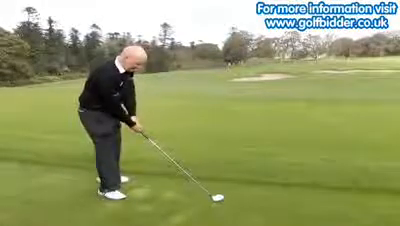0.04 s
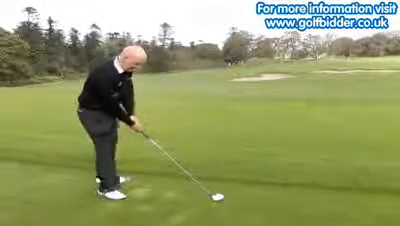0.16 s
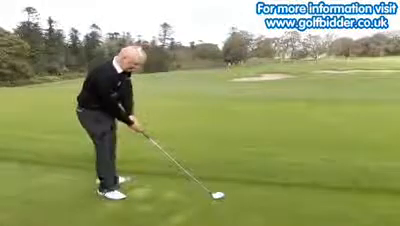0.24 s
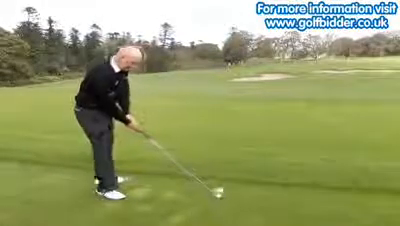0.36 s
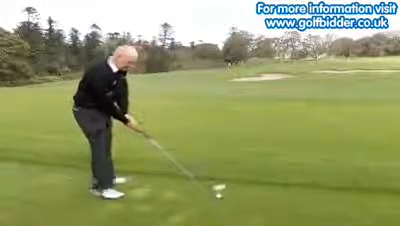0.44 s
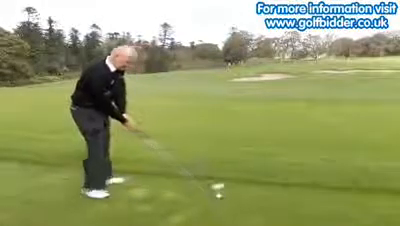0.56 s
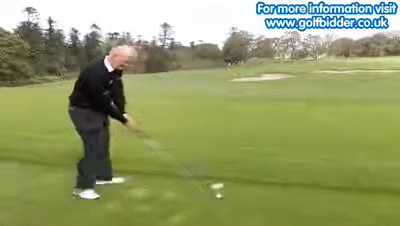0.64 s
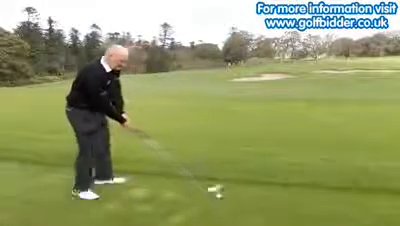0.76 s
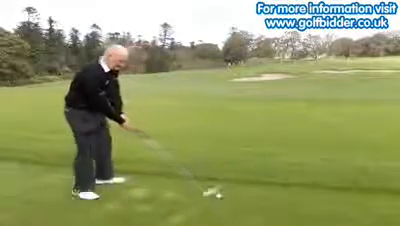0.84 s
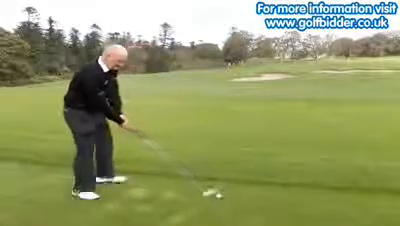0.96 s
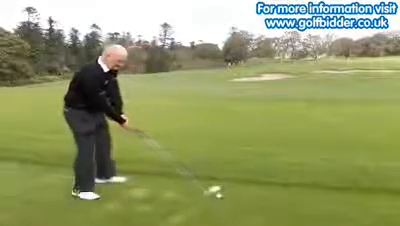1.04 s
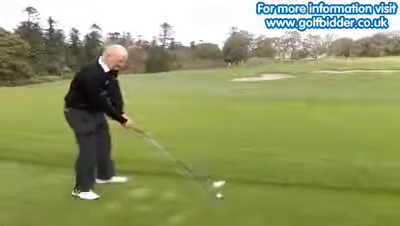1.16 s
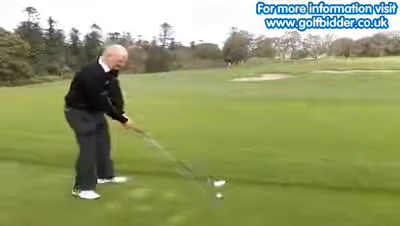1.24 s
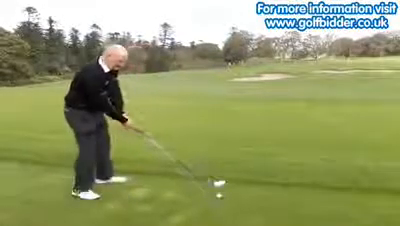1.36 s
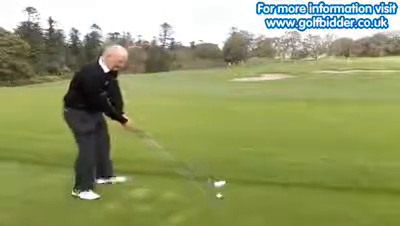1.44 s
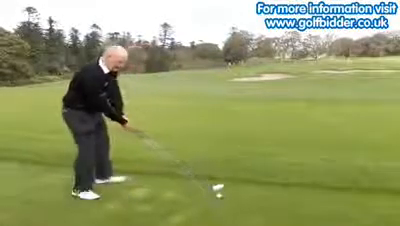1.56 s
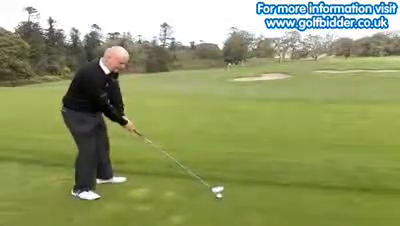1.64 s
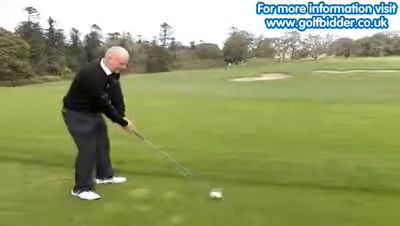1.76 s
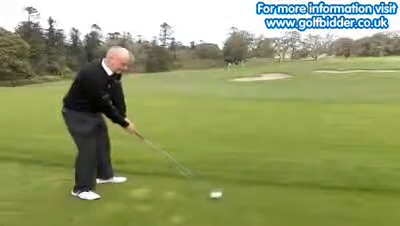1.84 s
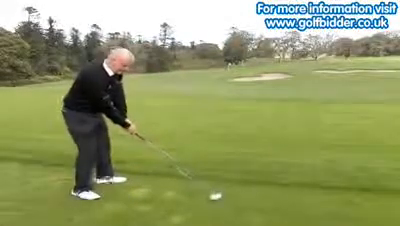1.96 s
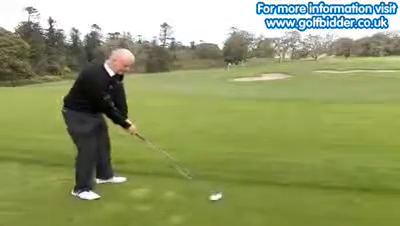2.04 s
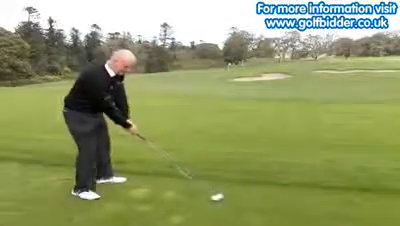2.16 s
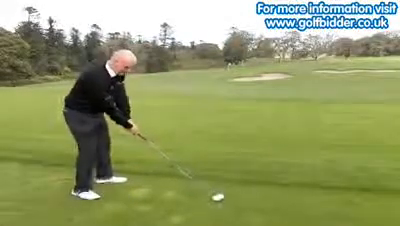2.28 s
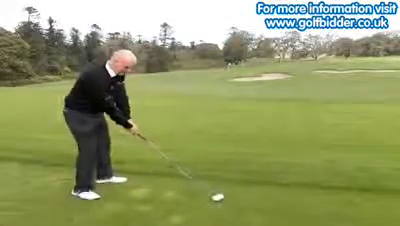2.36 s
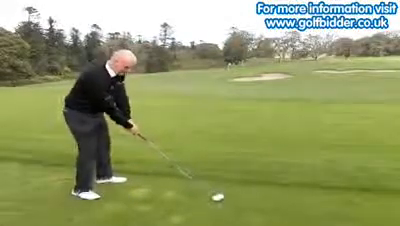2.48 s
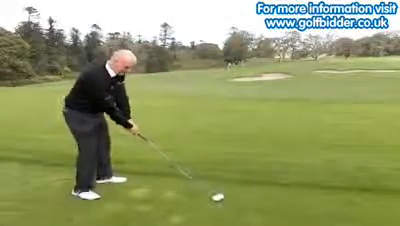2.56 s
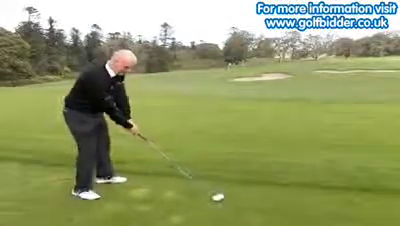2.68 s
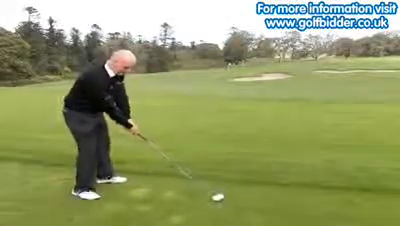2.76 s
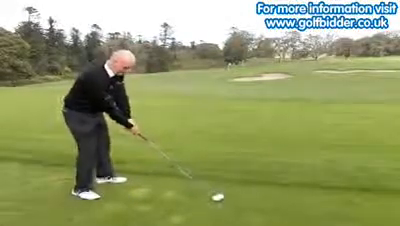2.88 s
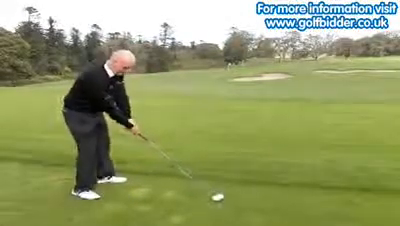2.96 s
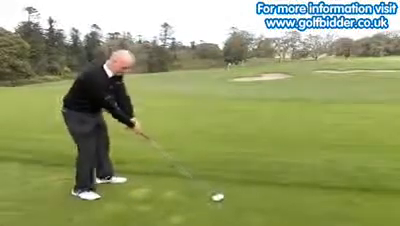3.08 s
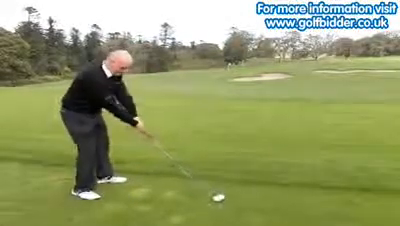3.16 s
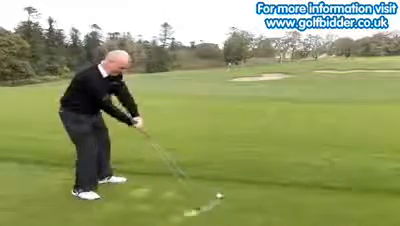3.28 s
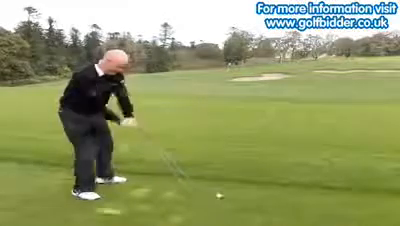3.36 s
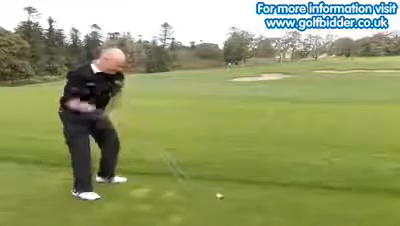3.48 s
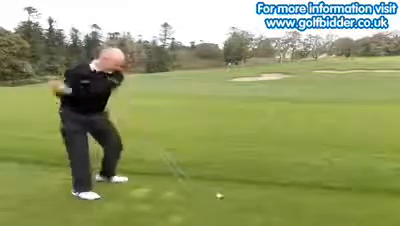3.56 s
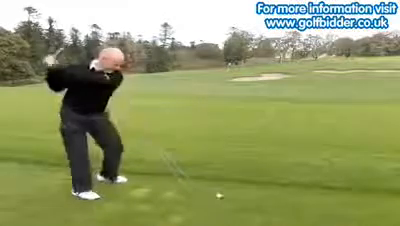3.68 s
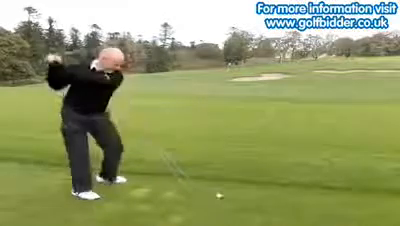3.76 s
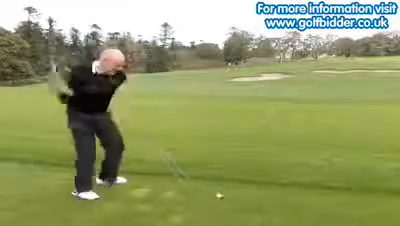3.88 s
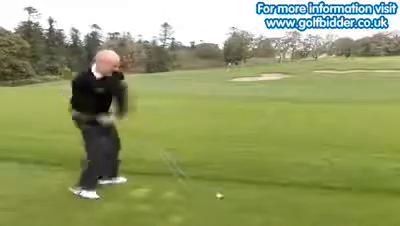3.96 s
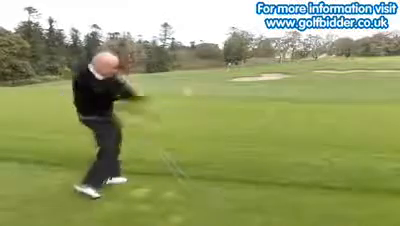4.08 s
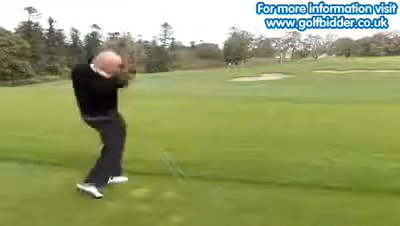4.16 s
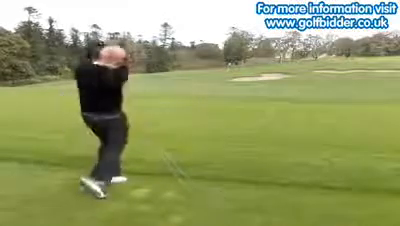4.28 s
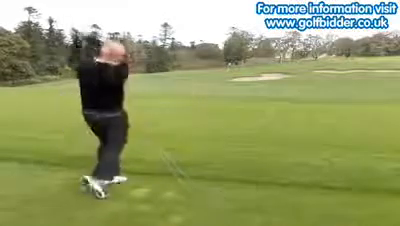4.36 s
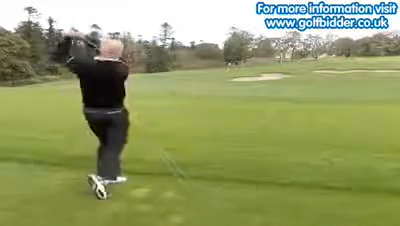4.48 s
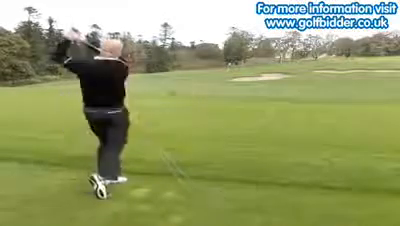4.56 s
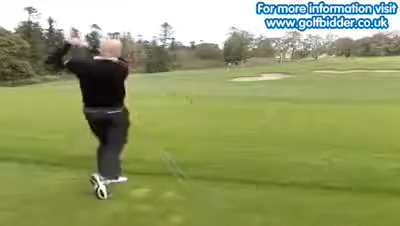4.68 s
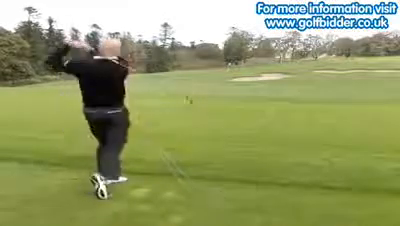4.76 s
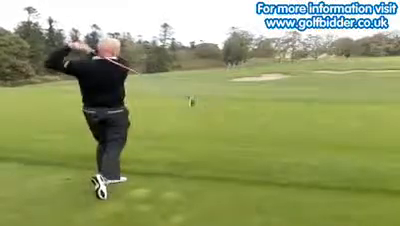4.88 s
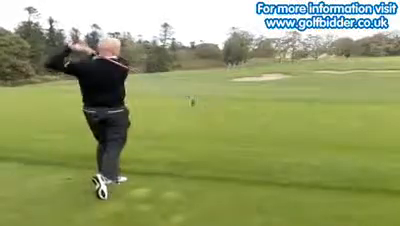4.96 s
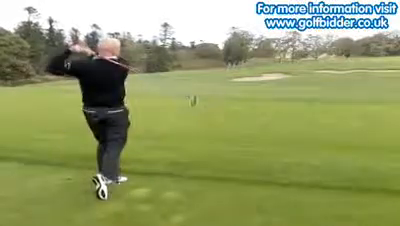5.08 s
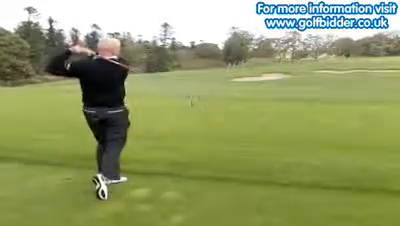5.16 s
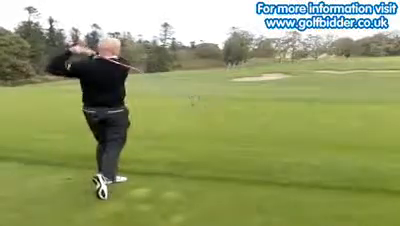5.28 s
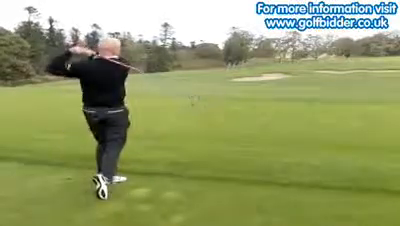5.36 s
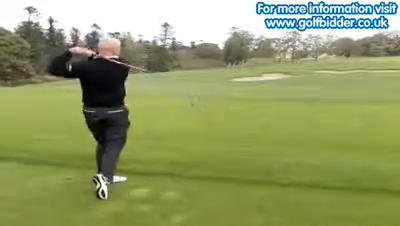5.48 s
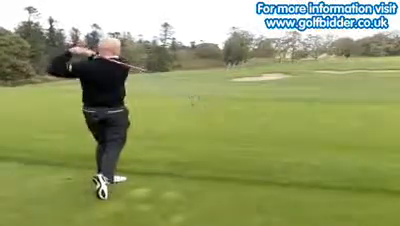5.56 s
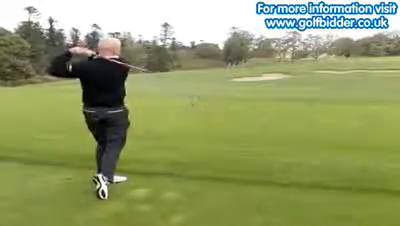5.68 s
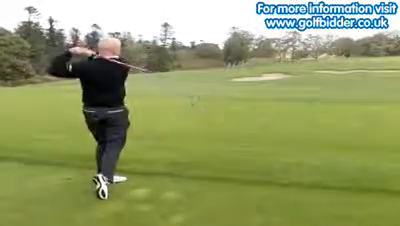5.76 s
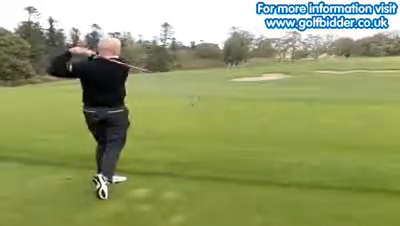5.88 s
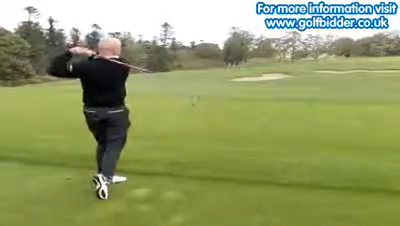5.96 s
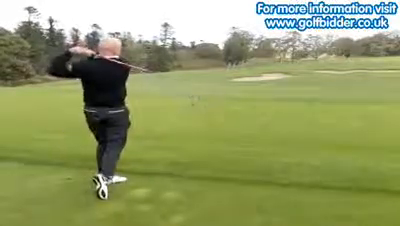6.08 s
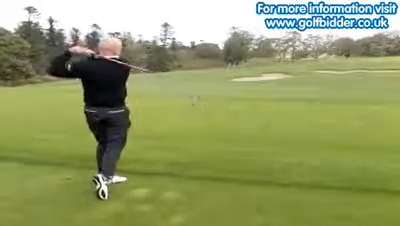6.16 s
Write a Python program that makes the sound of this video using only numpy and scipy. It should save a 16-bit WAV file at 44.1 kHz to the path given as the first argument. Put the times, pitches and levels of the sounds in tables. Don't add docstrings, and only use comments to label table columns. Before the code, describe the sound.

Outdoors on an open fairway, low wind gusts thump and flutter against a small camera microphone over a soft hiss of far trees. About two thirds through, a quick swish climbs into one hard, hollow crack of club on ball, a few metres away, overloading the input. A brief metallic ring and weak echo fade, and the wind returns.

```python
import sys
import numpy as np
from scipy import signal
from scipy.fft import rfft, irfft, dct, next_fast_len
from scipy.io import wavfile
from scipy.ndimage import uniform_filter1d

SR = 44100
rng = np.random.default_rng(int(sys.argv[2]) if len(sys.argv) > 2 else 0)


def volts_from_db(level):
    exponent = np.asarray(level, float) / 20
    return 10 ** exponent


def to_wav(sig):
    pcm = np.clip(np.atleast_2d(sig), -1, 1) * 32767
    pcm = np.round(pcm).astype(np.int16)
    wavfile.write(sys.argv[1], SR, pcm.T)


N = 274698
T = np.arange(N) / SR
STRIKE_S = 4.2339
CONTACT_S = 0.0003


def curve(rows, column=1):
    rows = np.array(rows, float)
    return np.interp(T, rows[:, 0], rows[:, column])


def noise(colour):
    hz, db = np.transpose(colour)
    size = next_fast_len(N)
    bins = np.arange(size // 2 + 1) * SR / size + 1e-3
    gain = volts_from_db(np.interp(np.log(bins), np.log(hz), db, -150, -150))
    x = irfft(rfft(rng.standard_normal(size)) * gain, size)[:N]
    return x / np.std(x)


def walk(rate):
    k = int(SR / rate)
    held = np.repeat(rng.standard_normal(N // k + 1), k)
    return 1.3 * uniform_filter1d(uniform_filter1d(held, k), k)[:N]


def bump(at_s, length_s):
    return np.exp(-0.5 * ((T - at_s) / length_s) ** 2)


def swell(at_s, db, hz, length_s):
    return volts_from_db(db) * bump(at_s, length_s) * np.sin(2 * np.pi * (hz * (T - at_s) + rng.random()))


def ring(at_s, db, hz, t60_s, rise_s=CONTACT_S):
    t = np.maximum(T - at_s, 0)
    push = 1 - np.exp(-(t / rise_s) ** 2)
    decay = np.exp(-np.log(1000) * t / t60_s)
    return volts_from_db(db) * push * decay * np.sin(2 * np.pi * hz * t)


# time in seconds, level in dB.
TREES = [(0, -40), (.5, -37), (1.5, -35), (2.2, -35.5), (3.0, -34.5), (4.1, -34.5), (4.65, -35.5),
         (6.23, -34)]
# frequency in Hz, density in dB per Hz.
LEAVES = [(200, -24.5), (330, -3.5), (450, -1.5), (800, -3.5), (1300, -10), (1750, -14.5), (2200, -19),
          (2600, -28.5), (2850, -43), (3100, -28), (3600, -24), (4400, -31), (5200, -35.5), (7500, -43.5),
          (8500, -64)]


def trees():
    return noise(LEAVES) * volts_from_db(curve(TREES) + 1.46 + 0.65 * walk(5.5))


def steady(x, seconds):
    return x / np.sqrt(uniform_filter1d(x ** 2, size=int(SR * seconds)) + 0.073)


# time in seconds, strength in dB.
BREEZE = [(0, -23.5), (.3, -21.5), (.9, -24.5), (1.4, -22), (2.0, -22.5), (2.5, -21.5), (2.85, -23),
          (3.1, -25.5), (3.5, -22.5), (4.05, -26), (4.24, -22.5), (4.29, -30.5), (4.45, -24.5),
          (4.7, -27.5), (5.1, -21), (5.25, -28), (5.6, -26.5), (6.23, -31)]
# time in seconds, rise in dB, length in seconds,
# fineness from 0 (big slow lumps) to 1 (small quick ones).
GUSTS = [(.09, 13, 0.047, 0.26), (0.155, 7, 0.043, 0.1), (0.425, 2.5, 0.055, 1), (.59, 4.5, 0.092, .5),
         (0.83, 4.5, 0.073, .1), (1.038, -1, .02, .9), (1.122, 7.5, 0.088, 0.25), (1.361, 4, 0.049, .6),
         (1.478, 7.5, 0.032, 0), (1.833, 12.5, 0.035, 0.46), (1.97, 10, 0.029, 0.95),
         (2.097, 10.5, .03, 0.88), (2.23, 5, .03, 0.32), (2.56, 2.5, 0.049, 0), (2.634, 7.5, 0.024, 0.92),
         (2.745, 8.5, 0.076, .8), (3.32, 3.5, 0.047, 1), (3.402, 4, 0.04, 0), (3.586, 7, 0.037, 0.47),
         (3.75, 5.5, 0.034, 0.5), (3.987, 7.5, .05, 0.3), (4.547, 4, 0.033, 0.6), (4.79, 11.5, 0.035, 0.25),
         (4.955, 6.5, 0.097, 0.28), (5.138, 7.5, .04, 0.47), (5.67, 2, 0.055, 0.74), (5.802, 8, 0.046, 0),
         (5.95, 13.5, 0.022, 0.4), (6.03, 6, .02, 0.03), (6.18, 7.5, .03, 0.22)]


def gusting(offset_db, follow, coarse_share, fine_share):
    mean_db = -25
    db = mean_db + offset_db + follow * (curve(BREEZE) - mean_db)
    for at_s, rise_db, length_s, fine in GUSTS:
        share = coarse_share * (1 - fine) + fine_share * fine
        db = db + rise_db * share * bump(at_s, length_s)
    return volts_from_db(db)


# frequency in Hz, density in dB per Hz.
RUMBLE = [(4, -14), (11, -1), (28, -4.5), (48, -1.5), (80, -7), (120, -23), (200, -54.5)]
FLUTTER = [(50, -26), (90, -0.5), (130, -1.5), (190, -5.5), (280, -20), (500, -40)]
WHIP = [(120, -20.5), (200, -2), (300, -4), (420, -16.5), (700, -27)]


def wind():
    rumble = steady(noise(RUMBLE), 0.12) * gusting(0.23, 1.05, 0.9, 0.035)
    flutter = steady(noise(FLUTTER), 0.1) * gusting(-5, 0.56, 0.088, 0.94) * volts_from_db(0.8 * walk(13))
    whip = steady(noise(WHIP), 0.084) * gusting(-14.5, 0.54, 0.18, 1.27) * volts_from_db(1.2 * walk(20))
    return rumble + flutter + whip


# start in seconds, level in dB, pitch in Hz, t60 in seconds.
SOLE = [
    (0.96, -39, 2500, 0.027),
    (0.857, -41, 3400, .03),
]


def address():
    return sum(ring(*touch) for touch in SOLE)


def treeline():
    level_db, t60_s, flicker_db = -37.5, 0.6, 2.5
    after = T - STRIKE_S
    db = level_db - 60 * abs(after) / t60_s + flicker_db * walk(90)
    return noise(RUSH_COLOUR) * volts_from_db(db) * (after > 0)


# frequency in Hz, density in dB per Hz.
BRIGHT_HISS = [(1500, -22), (2400, -3), (3500, -1), (4700, 0.5), (5200, -24)]


def bright_hiss():
    level_db, lead_s, last_s, ramp_s = -39.5, 0.03, 0.043, 0.006
    after = T - STRIKE_S
    brush = np.clip(np.minimum(after + lead_s, last_s - after) / ramp_s, 0, 1)
    return noise(BRIGHT_HISS) * volts_from_db(level_db) * brush


# start in seconds, level in dB, pitch in Hz, t60 in
# seconds.
TURF = [
    (4.267, -20, 910, 0.0087),
    (4.267, -24.5, 1700, 0.0067),
    (4.273, -28, 464, 0.054),
    (4.3165, -34, 1520, .006),
]


def turf():
    return sum(ring(*hit) for hit in TURF)


# peak time in seconds, peak level in dB, pitch in Hz, length in seconds.
EDDIES = [(4.143, -24, 427, 0.0067), (4.157, -7.5, 486, 0.0021), (4.166, -11.5, 557, .003),
          (4.178, -9.5, 633, 0.0052), (4.185, -17, 690, 0.0027), (4.194, -13.5, 680, .003),
          (4.2022, -4.5, 747, .002), (4.210, -5, 700, 0.002), (4.220, -8.5, 776, 0.0039),
          (4.226, -7.5, 695, 0.0019), (4.233, -10, 698, .0012)]
# time in seconds, level in dB.
RUSH = [(4.12, -59), (4.155, -26.5), (4.19, -21), (4.215, -13.5), (4.232, -12), (4.24, -30.5), (4.27, -34),
        (4.29, -44)]
# frequency in Hz, density in dB per Hz.
RUSH_COLOUR = [(100, -11.5), (300, 7.5), (450, 2), (650, 3.5), (900, 0), (1400, -6.5), (2200, -20),
               (3500, -24), (4700, -28), (6500, -32), (7200, -50)]


def swing():
    whistle = sum(swell(*eddy) for eddy in EDDIES)
    rush = noise(RUSH_COLOUR) * volts_from_db(curve(RUSH)) * (abs(T - 4.2) < 0.1)
    return whistle + rush


CROWN_HZ = [5190, 5577, 5950, 6100, 6200, 6445, 7300, 7430, 7500, 7745, 8345]
# level in dB, t60 in seconds.
CROWN = [(-29, .06), (-38, 0.077), (-26, 0.089), (-52, 0.4), (-30, 0.084), (-26.5, .07), (-34, 0.13),
         (-26, 0.067), (-34, .09), (-25.5, 0.049), (-30, 0.074)]


def crown():
    return sum(ring(STRIKE_S, db, hz, t60, rise_s=0.0028) for hz, (db, t60) in zip(CROWN_HZ, CROWN))


# pitch in Hz, level in dB against the strike, t60 in seconds.
FACE = [(1160, 6, .0075), (1412, 5.5, .007), (1653, 2, 0.007), (2384, -10.5, 0.013), (2932, -9, 0.014),
        (3684, -4, 0.0063), (4020, -11.5, 0.012), (4490, -18, 0.02), (6080, -20.5, 0.024)]


def face():
    strike_db = -0.5
    return sum(ring(STRIKE_S, strike_db + db, hz, t60) for hz, db, t60 in FACE)


def duck():
    drop_s, hold_s, back_s = 0.08, 0.19, 0.026
    after = T - STRIKE_S
    drop = np.clip(1 + after / drop_s, 0, 1)
    return drop / (1 + np.exp(np.clip((after - hold_s) / back_s, -50, 50)))


def scene():
    duck_db = -6.5
    background = (wind() + trees()) * volts_from_db(duck_db * duck())
    blow = face() + crown() + turf()
    mono = background + address() + treeline() + bright_hiss() + swing() + blow
    return np.array([mono, mono])


# frequency in Hz, step in dB against the frame's 1-2.5 kHz level.
STEP = [(100, -12), (2000, -20), (2680, -19.5), (2710, -1.5), (2950, -2), (2990, -20), (4600, -16),
        (4800, -10.5), (7500, -15), (9000, -11)]
# frequency in Hz, power.
MASKING = [(1880, 0), (1910, 1.6), (2210, 1.6), (2240, .1), (2660, .1), (2690, .5), (2950, .5), (2980, .2),
           (4770, .2), (4800, .45), (5150, .45), (5300, .2)]


def coarse(x):
    hop, grid = 1152, 868
    half = hop // 2
    window = np.sin(np.pi * (np.arange(2 * hop) + 0.5) / (2 * hop))
    padded = np.pad(x, (2 * hop - grid, 3 * hop), mode="reflect")
    blocks = padded[:(N // hop + 4) * hop].reshape(-1, hop)
    a, b, c, d = np.split(np.hstack([blocks[:-1], blocks[1:]]) * window, 4, axis=1)
    lines = dct(np.hstack([-c[:, ::-1] - d, a - b[:, ::-1]]), 4, norm="ortho")
    hz = (np.arange(hop) + 0.5) * SR / (2 * hop)
    middle = lines[:, (hz > 1000) & (hz < 2500)]
    level = np.sqrt(np.mean(middle ** 2, axis=1, keepdims=True)) + 1e-9
    step = level * volts_from_db(np.interp(hz, *np.transpose(STEP)))
    step *= (level / np.median(level)) ** np.interp(hz, *np.transpose(MASKING))
    folded = dct(np.round(lines / step) * step, 4, norm="ortho")
    p, q = folded[:, :half], folded[:, half:]
    frames = np.hstack([q, -q[:, ::-1], -p[:, ::-1], -p]) * window
    joined = frames[1:, :hop] + frames[:-1, hop:]
    return joined.ravel()[hop - grid:][:N]


# time in seconds, level in dB, pitch in Hz, t60 in seconds.
OVERLOAD_TICK = (4.2315, -41, 12800, .007)


def overload(x):
    rounded = x / (1 + (abs(x) / 1.22) ** 6) ** (1 / 6)
    return np.clip(coarse(rounded), -0.98, 0.98) + ring(*OVERLOAD_TICK)


# frequency in Hz, density in dB per Hz.
HISS = [(1760, -81), (3000, -45), (3090, -38), (3300, -18.5), (3960, 2.5), (7430, 4.5), (8650, -1),
        (9570, -12), (10000, -8), (13000, -58.5), (22000, -120)]


def side_hiss():
    hiss = noise(HISS) * volts_from_db(-58.5 - 60 * duck() ** 2)
    return hiss * np.array([[1], [-1]])


def top_cut(x):
    return signal.sosfilt(signal.butter(12, 16000, fs=SR, output="sos"), x)


def record(dry):
    fade = np.clip((T[-1] - T) / 0.012, 0, 1)
    mix = (overload(dry[0]) + side_hiss()) * fade
    return top_cut(mix)


dry = scene()
out = record(dry)
to_wav(out)
```